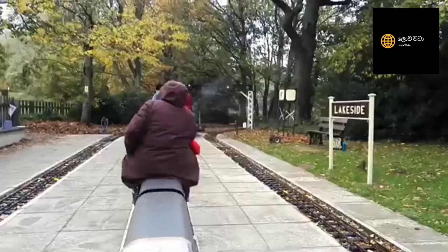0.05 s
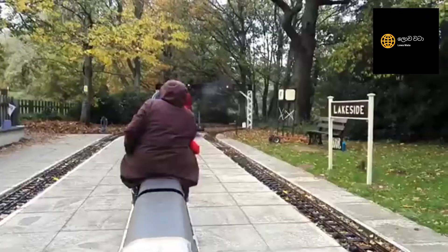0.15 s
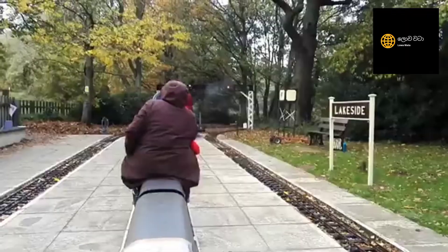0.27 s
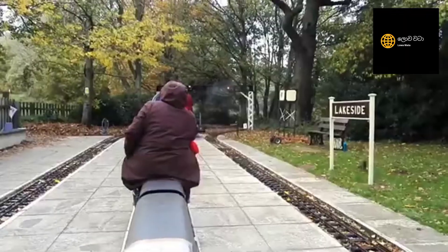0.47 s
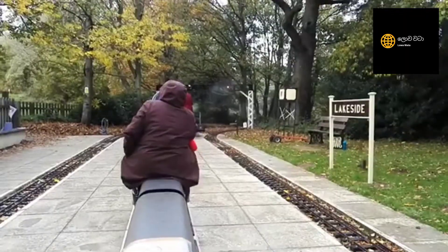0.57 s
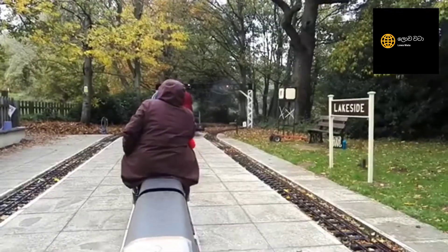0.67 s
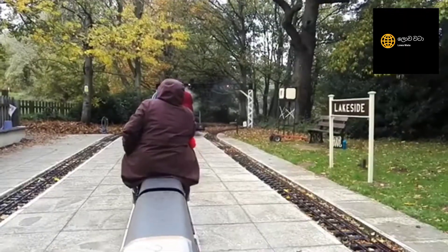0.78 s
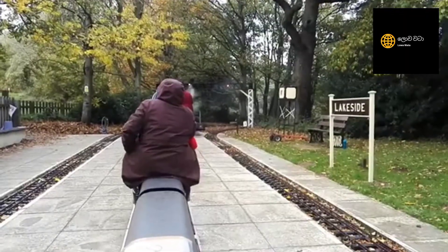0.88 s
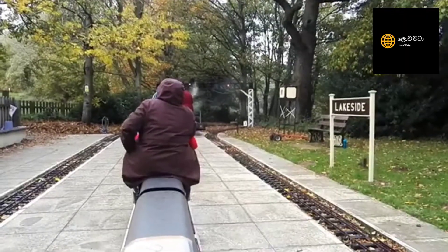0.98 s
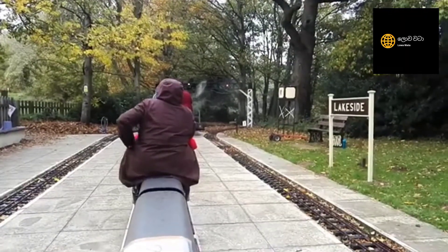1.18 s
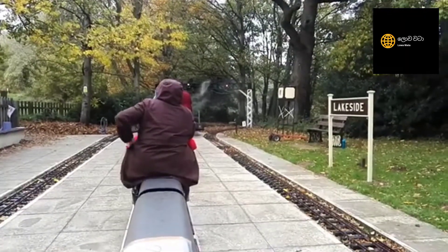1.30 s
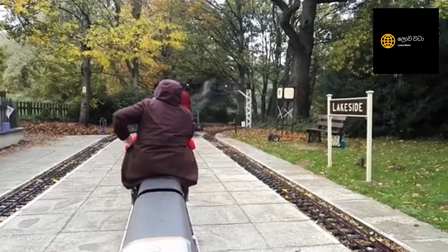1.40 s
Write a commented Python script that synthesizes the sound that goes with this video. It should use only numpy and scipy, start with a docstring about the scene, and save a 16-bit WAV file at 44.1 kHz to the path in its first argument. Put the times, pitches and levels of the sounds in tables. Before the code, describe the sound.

After a brief quiet park background of low rumble and hiss, a shrill whistle trills for most of a second, dips, then blows again briefly and stops, leaving a short diffuse echo; stereo camera microphone at some distance.

```python
"""In a park, some metres from a stereo camera's microphones, a small pea whistle is blown twice.
Each blow is a stack of overtones plus jet noise; the pea pulls the pitch down once a turn.
Paving, signs and trees answer with sparse near echoes and a diffuse tail, made of decaying noise.
Behind lie coloured noise for distant rumble and soft hiss, narrow noise for a faint hum, and one short
rising chirp just ahead of the first blow."""
import sys
import numpy as np
from scipy import signal
from scipy.fft import rfft, irfft
from scipy.io import wavfile
from scipy.ndimage import uniform_filter1d, map_coordinates

SR = 44100
rng = np.random.default_rng(int(sys.argv[2]) if len(sys.argv) > 2 else 0)


def inscribe(sig):
    """Save sig as 16-bit PCM at rate SR to the path in sys.argv[1].

    A 1-D sig is mono; a 2-D sig holds one channel per row.
    Samples are clipped to [-1, 1] before scaling.
    """
    pcm = np.round(np.clip(np.atleast_2d(sig).T, -1, 1) * 32767)
    wavfile.write(sys.argv[1], SR, pcm.astype(np.int16))


N = 63945

# How hard the whistle is blown: t/s, level/dB, top pitch f/Hz, brightness/dB
FIRST_BLOW = [(.192, -25, 2097, -6), (.206, -31, 2139, -19), (.24, -28, 2278, 4), (.265, -26, 2366, -12),
              (.33, -24, 2412, -5.5), (.40, -21, 2416, -3), (.47, -18.5, 2473, 0.2), (.53, -22, 2458, 3),
              (.6, -22, 2500, 1.5), (.67, -18.5, 2435, -1), (.74, -24, 2454, -2.5), (.79, -27, 2330, -1),
              (.85, -35, 2218, 3), (.9, -33.5, 2183, -1)]
SECOND_BLOW = [(.88, -38, 2150, 3), (.925, -25.5, 2315, -3), (.97, -21.5, 2440, 1.5),
               (1.03, -19, 2505, 2.3), (1.09, -22, 2540, 2.3), (1.15, -23.5, 2495, 3.6),
               (1.161, -24.5, 2460, -29), (1.174, -54, 2430, -3)]
# Whirling of the pea, which passes the mouth at each whole turn: t/s, turns done
FIRST_PEA_TURNS = [(.185, -1.9), (.226, -1), (.252, 0), (.287, 1), (.365, 4), (.389, 5), (.495, 10),
                   (.602, 15), (.69, 19), (.9, 28.5)]
SECOND_PEA_TURNS = [(.88, -4.1), (.964, 0), (1.044, 4), (1.143, 9), (1.175, 10.6)]
# Overtones of the whistle: multiple of the pitch, level/dB, share of the brightness,
# left minus right level/dB, level change as the pea passes/dB
WHISTLE_OVERTONES = [(1, 1, 0, -0.67, -2), (2, -15.5, 0, -4, -4.5), (3, -32, 0, -11.5, 4),
                     (4, -18, 2.23, -4.8, 0), (5, -39, 0.28, 34.5, -13), (6, -32, 0.57, 8, -3)]
# Colour of the direct path, which favours the top of each warble: f/Hz, level/dB
DIRECT_COLOUR = [(1900, -6), (2200, -7), (2400, 4), (2700, 4), (4000, -1), (8500, -3), (9700, 4),
                 (14000, 1)]
# Swell of the distant rumble: t/s, level/dB
RUMBLE_SWELL = [(0.0, -57.5), (0.354, -53), (0.46, -49.5), (0.536, -51.5), (0.786, -50), (0.806, -52.5),
                (1.05, -55), (1.074, -47.5), (1.098, -56), (1.36, -55.5), (1.392, -51.5), (1.45, -62)]
# Spectrum of the rumble before levelling: f/Hz, level/dB
RUMBLE_SPECTRUM = [(12, -43), (20, -18), (54, 0.5), (119, -5), (177, -2), (203, -13), (231, -5.5),
                   (260, -4), (340, -26), (570, -120)]
# Spectrum of the park's floor before levelling: f/Hz, level/dB
PARK_SPECTRUM = [(100, -11.5), (200, -8), (300, -7.5), (600, -2), (900, -8.5), (1800, -17.5), (3500, -14.5),
                 (7000, -14.5), (12000, -15), (14500, -24.5)]
# Stereo width of the floor, side against mid: f/Hz, level/dB
PARK_WIDTH = [(220, -16), (400, -5), (700, 0.5), (1300, 3), (3000, 2.3), (14000, -1.1)]
# Swell of the hum about its own level: t/s, level/dB
HUM_SWELL = [(0, -1.5), (.2, 1.5), (.55, 1.5), (.9, -5), (1.45, -5)]

# Pea: share of pitch lost at a pass, squareness of each arch, wander in turns, relative spread of depth
PEA_DIP_SHARE, PEA_ARCH_POWER, PEA_UNEVEN_TURNS, PEA_DEPTH_SPREAD = .18, 2.5, .025, .12
JITTER_SHARE, SHIMMER_DB = 0.00258, 1.5  # spread of pitch and of each overtone's level
SOFT_EDGE_S = .012  # the blow fades in and out
BREATH_DB = -23  # jet noise against the blow, before colouring
LEFT_LAG_S = .00052  # direct sound arrives later on the left
EARLY_DB, EARLY_T60_S, EARLY_START_S, EARLY_PER_S = -4, .04, .001, 1500
TAIL_DB, TAIL_T60_S, TAIL_TREBLE_T60_S, TAIL_START_S = -4, 0.56, 0.17, 0.0105
WET_TREBLE_DB = 1
CHIRP_S, CHIRP_HALF_LEN_S, CHIRP_HZ, CHIRP_RISE_HZ_PER_S, CHIRP_DB = .158, .009, 2520, 12000, -46
RUMBLE_SIDE_DB = -14
PARK_DB = -43
HUM_HZ, HUM_WIDTH_HZ, HUM_DB = 646, 14, -60
TOP_HZ = 14300


def blast(blow, pea_turns):
    """One blow, left and right: a jet tone whose pitch and overtone levels change at each pass of the pea."""
    t = np.arange(N) / SR
    s, db, hz, bright_db = np.array(blow).T
    blow_db = np.interp(t, s, db)
    brightness_db = np.interp(t, s, bright_db)

    # the dip is 1 as the pea passes the mouth and 0 half a turn away
    turn = np.interp(t, *np.array(pea_turns).T) + PEA_UNEVEN_TURNS * walk(40)
    dip = np.abs(2 * (turn % 1) - 1) ** PEA_ARCH_POWER
    dip = uniform_filter1d(dip, size=44)
    pitch_drop = PEA_DIP_SHARE * dip * (1 + PEA_DEPTH_SPREAD * walk(49.43))
    pitch = np.interp(t, s, hz) * (1 - pitch_drop + JITTER_SHARE * walk(225))
    phase = 2 * np.pi * np.cumsum(pitch) / SR

    breath = colour(rng.standard_normal(N), [(1500, -43), (4000, -66), (9000, 19), (14000, -10)])
    out = undb(BREATH_DB + blow_db) * breath
    for multiple, overtone_db, bright_share, pan_db, pass_db in WHISTLE_OVERTONES:
        tone_db = blow_db + overtone_db + bright_share * brightness_db
        tone_db = tone_db + pass_db * dip + SHIMMER_DB * walk(167)
        tone = np.sqrt(2) * undb(tone_db) * np.sin(round(multiple) * phase)
        pan = undb(np.array([[pan_db], [-pan_db]]) / 2)
        out = out + tone * pan
    edge = np.clip(np.minimum(t - s[0], s[-1] - t) / SOFT_EDGE_S, 0, 1)
    return out * edge ** 2


def echoes():
    """One channel's response: sparse near echoes and a diffuse tail that loses treble first."""
    t = np.arange(SR // 2) / SR

    def fall(t60, start):
        """Decay of 60 dB in t60 seconds, with a short onset at start."""
        return np.exp(-np.log(1000) * t / t60) * np.clip((t - start) / 0.0025, 0, 1)

    def unit(h):
        """Scale to unit energy."""
        return h / np.sqrt(np.sum(h ** 2))

    sparse = rng.standard_normal(len(t)) * (rng.random(len(t)) < EARLY_PER_S / SR)
    near = sparse * fall(EARLY_T60_S, EARLY_START_S)
    noise = rng.standard_normal(len(t))
    low = colour(noise, [(5000, -9.5), (7000, -63)])
    rest = noise - low  # holds all the treble
    tail = low * fall(TAIL_T60_S, TAIL_START_S) + rest * fall(TAIL_TREBLE_T60_S, TAIL_START_S)
    response = undb(EARLY_DB) * unit(near) + undb(TAIL_DB) * unit(tail)
    return colour(response, [(3000, 0.045), (9000, WET_TREBLE_DB)])


def chirp():
    """A short soft note just before the first blow: a sine rising steadily under a bell-shaped swell."""
    t = np.arange(N) / SR - CHIRP_S
    swell = np.exp(-(t / CHIRP_HALF_LEN_S) ** 2)
    # half the rise inside the phase gives the full rise in pitch
    note = swell * np.sin(2 * np.pi * (CHIRP_HZ + CHIRP_RISE_HZ_PER_S * t / 2) * t)
    return np.sqrt(2) * undb(CHIRP_DB) * np.array([note, note])


def rumble():
    """Distant deep noise that swells and sinks, nearly alike left and right."""
    mid, side = (level(colour(rng.standard_normal(N), RUMBLE_SPECTRUM), 0) for _ in range(2))
    side = undb(RUMBLE_SIDE_DB) * side
    swell_db = np.interp(np.arange(N) / SR, *np.array(RUMBLE_SWELL).T)
    return np.array([mid + side, mid - side]) * undb(swell_db)


def park():
    """Noise floor of low sound and hiss, nearly alike left and right in the bass, plus the hum."""
    mid = colour(rng.standard_normal(N), PARK_SPECTRUM)
    side = colour(colour(rng.standard_normal(N), PARK_SPECTRUM), PARK_WIDTH)
    floor = level(np.array([mid + side, mid - side]), PARK_DB) * undb(.5 * walk(4))
    return floor + hum()


def hum():
    """A faint wavering hum: narrow-band noise, independent left and right."""
    reach = 3 * HUM_WIDTH_HZ
    band = [(HUM_HZ - reach, -60), (HUM_HZ, 0), (HUM_HZ + reach, -60)]
    noise = np.array([colour(rng.standard_normal(N), band) for _ in range(2)])
    swell_db = np.interp(np.arange(N) / SR, *np.array(HUM_SWELL).T)
    return level(noise, HUM_DB) * undb(swell_db)


def undb(db):
    """Decibels to gain."""
    return 10 ** (np.asarray(db) / 20)


def level(x, db):
    """Scale to an rms level in dB."""
    return x * undb(db) / np.sqrt(np.mean(x ** 2))


def walk(rate):
    """Smooth random wander of spread 1: noise averaged twice over 1/rate seconds."""
    k = max(int(SR / rate), 1)
    w = rng.standard_normal(N)
    w = uniform_filter1d(uniform_filter1d(w, k), k)
    return w / np.std(w)


def colour(x, points):
    """Shape the spectrum by (f/Hz, level/dB) points, joined along log frequency."""
    f = np.maximum(np.arange(len(x) // 2 + 1) * SR / len(x), 1)
    hz, db = np.array(points).T
    gain = undb(np.interp(np.log(f), np.log(hz), db))
    return irfft(rfft(x) * gain, len(x))


def scene():
    """Whistle and chirp, direct and echoed, over the park and its rumble."""
    source = blast(FIRST_BLOW, FIRST_PEA_TURNS) + blast(SECOND_BLOW, SECOND_PEA_TURNS) + chirp()
    echoed = np.array([signal.fftconvolve(c, echoes())[:N] for c in source])
    left = map_coordinates(source[0], [np.arange(N) - LEFT_LAG_S * SR], order=3, mode="nearest")
    direct = np.array([colour(left, DIRECT_COLOUR), colour(source[1], DIRECT_COLOUR)])
    return direct + echoed + park() + rumble()


def record(dry):
    """The camera cuts the top with a steep low-pass."""
    cut = signal.ellip(14, .3, 80, TOP_HZ, fs=SR, output="sos")  # ripple .3 dB, stop band 80 dB down
    return signal.sosfilt(cut, dry)


dry = scene()
out = record(dry)
inscribe(out)
```